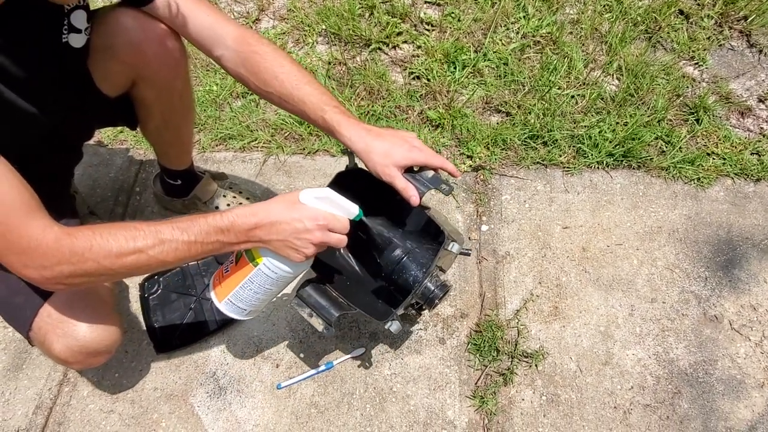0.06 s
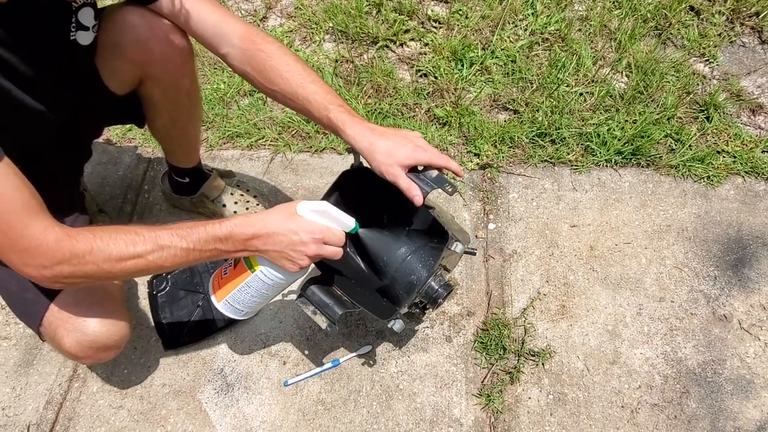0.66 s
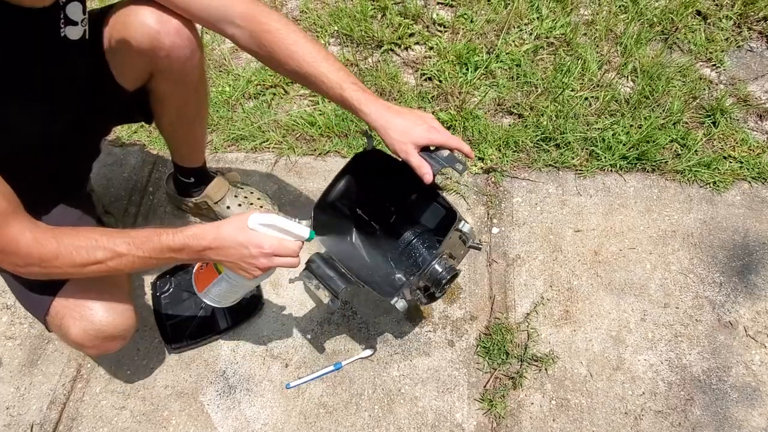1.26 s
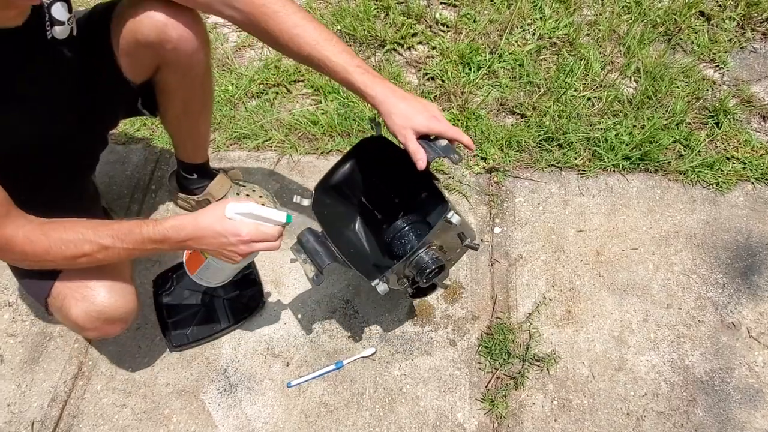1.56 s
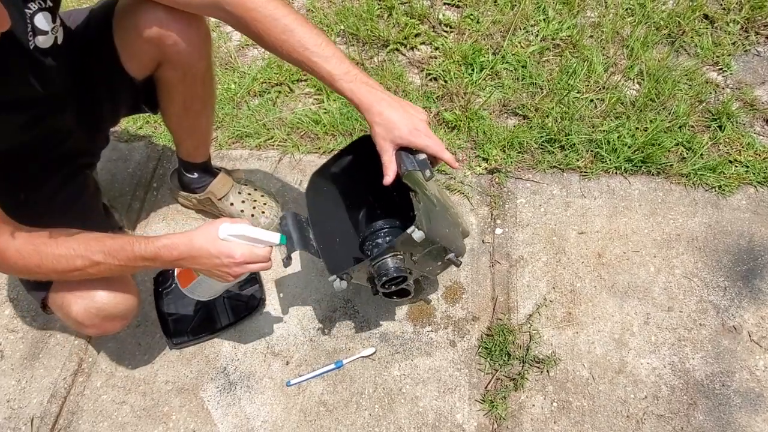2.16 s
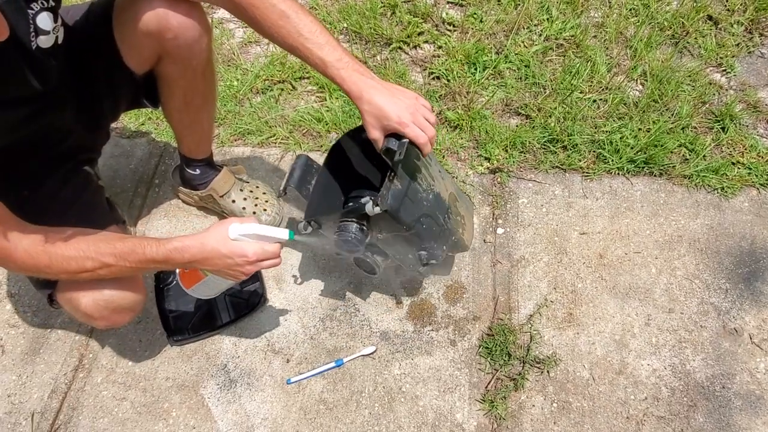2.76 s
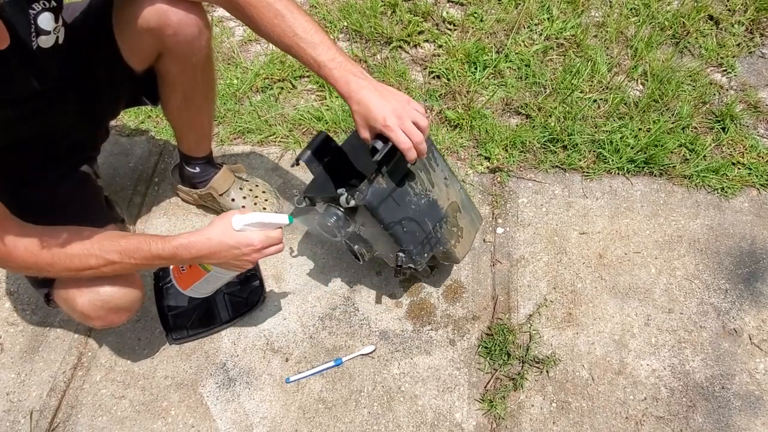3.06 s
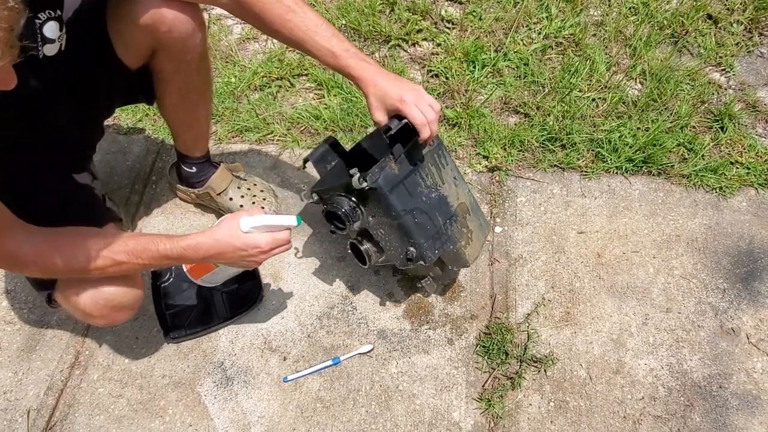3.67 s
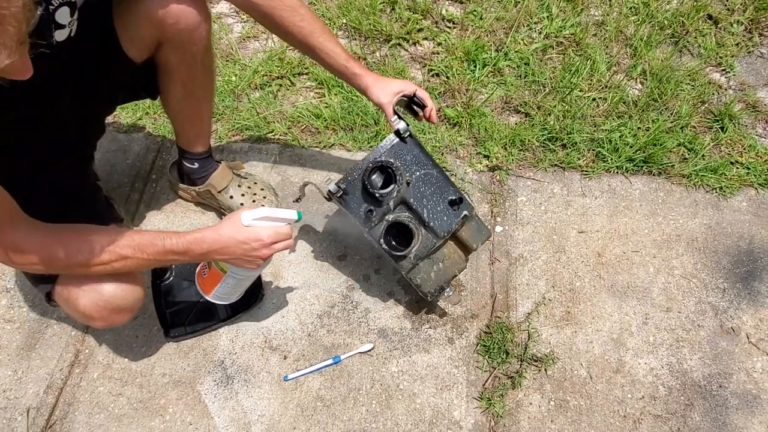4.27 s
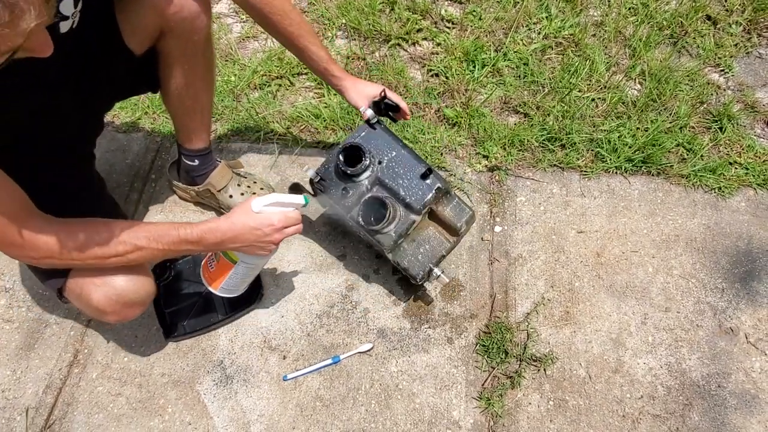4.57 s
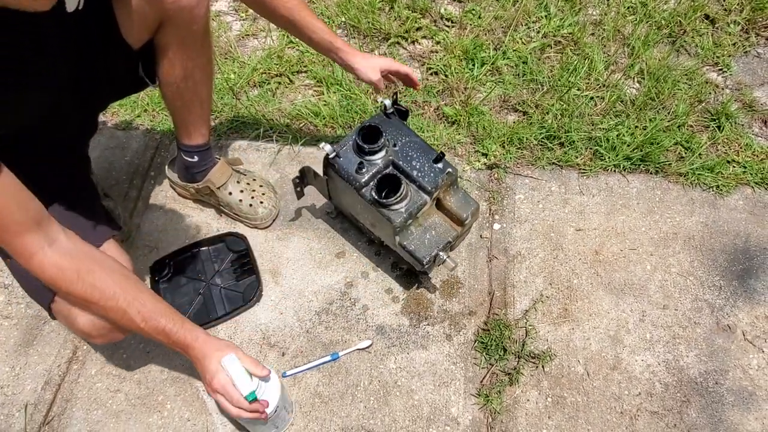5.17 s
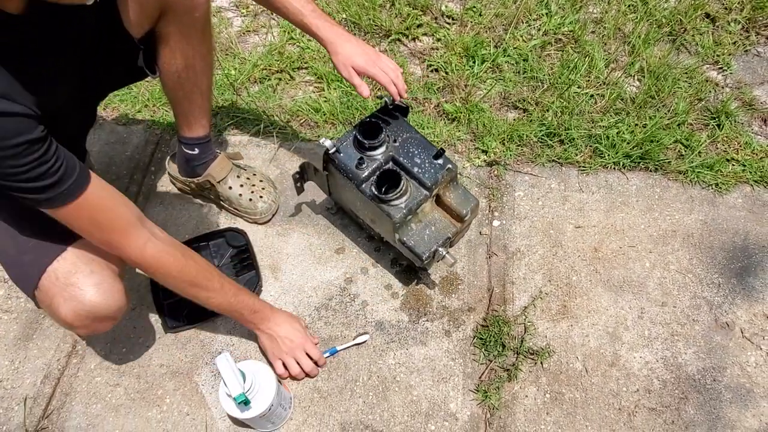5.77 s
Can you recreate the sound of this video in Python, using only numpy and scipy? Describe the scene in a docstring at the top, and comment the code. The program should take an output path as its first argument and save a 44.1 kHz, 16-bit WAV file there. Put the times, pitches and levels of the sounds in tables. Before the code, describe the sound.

A plastic tank gives a brief gritty scrape on concrete at the very start. From about 0.2 to 4.8 seconds a trigger spray bottle is pumped close by, roughly three strokes a second. Each stroke is a short, bright hiss with fine droplets pattering on plastic, followed by a small liquid gulp and the click of the returning trigger. At about 4 seconds the hollow tank bumps the ground with a dull boom. At 4.6 seconds it tips over with the loudest sound, a hollow clunk with a tiny metallic ping, then rocks with smaller knocks and crunching grit until about 5.1 seconds. The bottle is set down with a light thud near 5.2 seconds and ticks as it settles. Clothes rustle softly towards the end. A faint, low hum from a distant engine and quiet outdoor air continue throughout, with very little echo.

```python
"""A trigger bottle squirts cleaner onto a hollow plastic tank, about three strokes a second, outdoors.
In each stroke pump pressure drives a hissing jet whose droplets patter on the tank; the pump refills
with a gulp, the trigger snaps back, and at times the valve ticks. The tank scrapes on the concrete path
by stick-slip friction; later it tips over and rocks to rest, each impact exciting its damped modes.
The bottle is set down, clothes rustle, and a distant engine hums throughout."""
import sys
import numpy as np
from scipy import signal
from scipy.fft import rfft, irfft, next_fast_len
from scipy.io import wavfile
from scipy.ndimage import uniform_filter1d, map_coordinates

SR = 44100
rng = np.random.default_rng(int(sys.argv[2]) if len(sys.argv) > 2 else 0)


def generate_wav(sig):
    """Save sig (samples, or channels by samples) to the path in sys.argv[1] as 16-bit PCM at SR."""
    pcm = np.round(np.clip(np.atleast_2d(sig).T, -1, 1) * 32767).astype(np.int16)
    wavfile.write(sys.argv[1], SR, pcm)


N = 261072
TIME = np.arange(N) / SR
AGE = np.arange(SR // 2) / SR  # time since the onset of an event, t/s

# the trigger returns to its stop: t/s, snap level/dB, gulp level/dB
RELEASES = [(0.1987, -34, -41.5), (.5491, -31, -68), (.883, -56, -33.5), (1.1931, -32.5, -36),
            (1.5199, -37, -34), (1.8679, -37.5, -34), (2.2227, -33, -33.5), (2.5907, -37.5, -33),
            (2.9497, -40.5, -36), (3.3429, -47.5, -37), (3.7052, -39.5, -37), (4.0794, -36, -39),
            (4.4572, -41, -38.5), (4.8064, -38, -36.5)]
# spectrum of liquid passing the pump's valves: f/Hz, level/dB
LIQUID_SPECTRUM = [(200, -36), (450, -8), (1200, -7.5), (2000, -7.5), (2800, 4), (4200, -6), (5000, 1.5),
                   (6500, -4), (9500, -9), (12000, -6), (16000, -6)]


def mist():
    """Jet noise: hiss and droplet patter follow powers of the pump pressure, the patter more steeply."""
    squirts = [(0.283, 0.16, -53, -55.5), (0.609, 0.17, -50, -51), (.918, 0.18, -47.5, -48.5),
               (1.237, 0.18, -48, -50), (1.576, 0.19, -50, -52), (1.916, 0.19, -49.5, -50.5),
               (2.291, 0.19, -49, -51.5), (2.644, 0.18, -48.5, -53), (3.021, .21, -47.5, -55),
               (3.401, .19, -45.5, -54), (3.773, .2, -46, -52.5), (4.151, 0.2, -50.5, -55.5),
               (4.511, 0.19, -45.5, -50)]  # squeezes: t/s, duration/s, hiss level/dB, patter level/dB
    jet_spectrum = [(1000, -50), (3500, -28), (5000, -11), (6200, -13), (7400, 1), (8200, -5.5),
                    (10400, -6.5), (12000, 0), (14500, 4.5), (15800, 3)]  # hiss at the nozzle: f/Hz, level/dB
    neck_spectrum = [(200, -36), (350, -0.5), (460, 8.5), (620, -12), (850, -30), (1000, 2.5), (1150, -27),
                     (1300, -3), (1550, -5.5), (1850, -2.5), (2400, -46)]  # resonances of the tank's open neck: f/Hz, level/dB
    out = np.zeros((2, N))
    for s, length, hiss_db, patter_db in squirts:
        hiss = amp(hiss_db + 5) * pressure(length) ** 1.52 * noise(jet_spectrum, size=len(AGE))
        droplets = amp(patter_db + 4.5) * pressure(length) ** 2.53 * patter(s)
        add(out, s, bounced(hiss, share=.3) + bounced(droplets, share=.5))
    # one squirt blows into the neck
    add(out, 2.63, amp(-52.5) * pressure(length=0.24) * noise(neck_spectrum, size=len(AGE)))
    sputter_db = 1.5 * wobble(90) + 0.5 * wobble(1600)  # the jet breaks into droplets
    return out * amp(sputter_db)


def pressure(length):
    """Driving pressure of one squeeze: it builds, sags exponentially as the trigger travels, and dies."""
    sag_db_per_s = 7
    return swell(AGE, length, rise=0.059, fall=0.12) * amp(-sag_db_per_s * AGE)


def patter(s):
    """Resonant filtering: the hollow facing the jet at time s colours the noise of droplet impacts."""
    impact_spectrum = [(150, -46), (600, -6), (1100, -8.5), (1500, -6.5), (2250, -7), (2680, 2.5),
                       (3500, -7), (4200, -7.5), (4800, -2.5), (7000, -11.5), (15000, -14.5)]  # droplets on plastic: f/Hz, level/dB
    hollow = [(2.6, 1736), (3.3, 1590)]  # the resonance falls as the tank is turned: t/s, f/Hz
    hollow_hz = np.interp(s, *np.transpose(hollow))
    impacts = noise(impact_spectrum, size=len(AGE))
    return unit(filtered(impacts, lambda hz: 1 + 2.33 * resonance(hz, hollow_hz, half_width=87)))


def gulps():
    """Unsteady flow: the pump draws liquid in gurgles just before the trigger meets its stop."""
    lead_s, gurgle_db = .0355, 3
    out = np.zeros((2, N))
    for s, _, db in RELEASES:
        add(out, s - lead_s, amp(db + 1.5) * burst(LIQUID_SPECTRUM, attack=0.0073, t60=0.042))
    return out * amp(gurgle_db * wobble(250))


def valve():
    """Impulse excitation: the valve shuts as a squeeze begins and thumps the bottle and spray head."""
    closures = [(0.2724, -39), (0.604, -32.5), (0.911, -39.5), (1.9049, -37.5), (2.6274, -41.5),
                (2.994, -43.5), (3.381, -35)]  # audible closures: t/s, level/dB
    modes = [(467, 0, 0.044), (2560, -8, 0.043)]  # bottle and head: f/Hz, level/dB, T60/s
    out = np.zeros((2, N))
    for s, db in closures:
        add(out, s, amp(db - 5) * burst(LIQUID_SPECTRUM, attack=0.0019, t60=0.042))
        add(out, s, amp(db - 9) * ring(modes, attack=0.0019))
    return out


def trigger():
    """Free vibration: the trigger's sharp stop rings the plastic head, then the bottle shivers briefly."""
    head_modes = [(484, -12.5, 0.015), (740, -12.5, 0.019), (1180, -8, 0.0085), (1635, -7, 0.02),
                  (2612, -2.5, 0.019), (2800, 3, 0.014), (3680, -6.5, 0.023), (4590, -17, 0.024)]  # spray head: f/Hz, level/dB, T60/s
    snap_spectrum = [(300, -11), (800, -0.5), (3000, -1.5), (6500, -9), (16000, -15.5)]  # contact noise: f/Hz, level/dB
    out = np.zeros((2, N))
    for s, db, _ in RELEASES:
        crack = amp(-3) * burst(snap_spectrum, attack=.0016, t60=0.018)
        shiver = amp(-11.5) * burst(snap_spectrum, attack=.007, t60=0.074)
        head = amp([[3], [-.5]]) * ring(head_modes, attack=.0018, detune=.05)  # louder on the left
        add(out, s, amp(db) * (head + crack + shiver))
    return out


def tank():
    """Modal response to impact: a corner lands, the edge follows and the tank rebounds."""
    # landings: t/s, boom level/dB, boom centre f/Hz, knock level/dB, clack level/dB,
    # treble cutoff f/Hz, rebound delay/s
    landings = [(3.974, -11, 197, -25, -30, 1310, .022), (4.587, -30.5, 268, -41, -24, 3280, 0.011),
                (4.615, -9.5, 328, -22.5, -20, 8400, .051), (4.829, -17.5, 270, -32.5, -21.5, 5600, 0.024),
                (4.911, -15, 250, -35.5, -25.5, 7160, .054), (5.025, -30, 235, -58, -42.5, 4000, 0.023),
                (5.066, -39, 322, -70, -44.5, 4470, 0.023)]
    wall_modes = [(145.2, -11, 0.13), (206.6, -9.5, 0.25), (245.4, -1.5, 0.1), (282, -1.5, 0.075),
                  (293.1, -9.5, 0.27), (318.6, 3.5, 0.11), (363, -15.5, 0.079)]  # low modes of the wide walls: f/Hz, level/dB, T60/s
    shell_modes = [(444, -11, 0.1), (519.5, -4, 0.11), (604, -4.5, 0.047), (716, 3, 0.03), (841, -15, 0.11),
                   (943, -9, 0.063), (1077, -9, 0.11), (1455, -11, 0.05), (1613, -15, 0.087),
                   (1888, -5.5, 0.062), (2065, -12, 0.055), (2923, -30, 0.065), (3880, -11, 0.033)]  # stiff upper modes: f/Hz, level/dB, T60/s
    clack_spectrum = [(120, -24), (600, -12), (1200, -3.5), (1850, 0.5), (2300, -6.5), (3700, 0.5),
                      (6300, -9), (16000, -5.5)]  # plastic striking grit: f/Hz, level/dB
    boom_lag_s, boom_db_per_octave, edge_s = 0.0029, 13, .007
    out = np.zeros((2, N))
    for s, boom_db, boom_hz, knock_db, clack_db, cutoff_hz, rebound_s in landings:
        # the walls gather motion just after contact, mostly near one pitch
        excited = [(hz, db - boom_db_per_octave * abs(np.log2(hz / boom_hz)), t60)
                   for hz, db, t60 in wall_modes]
        for delay, db in [(0, 0), (rebound_s, -17.5)]:
            add(out, s + delay + boom_lag_s, amp(boom_db + db) * ring(excited, attack=0.0066))
        for delay, db in [(0, 0), (edge_s, -8.5), (rebound_s, -16)]:
            knock = amp(knock_db) * ring(shell_modes, attack=.001, detune=.004)
            grit = burst(clack_spectrum, attack=0.00046, t60=0.034)
            clack = amp(clack_db + 4.5) * bounced(grit, share=0.35)
            # a softer contact lasts longer and so loses its treble
            contact = filtered(knock + clack, lambda hz: 1 / (1 + 1j * hz / cutoff_hz) ** 2)
            add(out, s + delay, amp(db) * contact)
    return out


def bracket():
    """Hard contact excites high modes: the tank's steel bracket pings, louder on the left."""
    strikes = [(4.614, -21.5), (4.909, -38)]  # blows to the bracket: t/s, level/dB
    steel_modes = [(4610, -19, 0.12), (7470, -11.5, 0.1), (11140, 7, 0.06), (11210, -30, 0.25),
                   (11400, -7, .06)]  # its ringing: f/Hz, level/dB, T60/s
    out = np.zeros((2, N))
    for s, db in strikes:
        add(out, s, amp(db) * amp([[3], [-4]]) * ring(steel_modes, attack=0.00021))
    return out


def scrape():
    """Stick-slip friction: the tank's edge judders over sandy concrete and its shell resonates."""
    sand_spectrum = [(150, -1), (330, -17), (520, -7), (700, -19), (950, -5), (1200, -10), (1800, -3),
                     (2300, -5.5), (5000, -4), (6500, -7), (9500, -11.5), (12000, -7), (16000, -7.5)]  # sliding on sand: f/Hz, level/dB
    start_s, period_s, slip_s = -0.012, 0.01978, 0.01
    age = TIME - start_s
    push = amp(-30.5) * swell(age, length=0.14, rise=.045, fall=0.042)
    slips = push * np.exp(-((2 * (age % period_s) - period_s) / slip_s) ** 2)
    slips += 0.27 * uniform_filter1d(slips, size=1000)  # sand keeps trickling between the slips
    rasp = slips * amp(1.7 * wobble(896)) * noise(sand_spectrum)
    return filtered(rasp, lambda hz: 1 + 1.34 * resonance(hz, 520, 50) + 0.59 * resonance(hz, 1830, 110))


def grinding():
    """Granular friction: grains give way one after another under the rocking tank."""
    grinds = [(4.831, -43.5), (4.915, -37)]  # the tank bears on grit: t/s, level/dB
    # crunching grains: f/Hz, level/dB
    spectrum = [(200, 6.5), (1500, 4.5), (3000, 5.0), (4500, -1), (6500, -19), (16000, -16)]
    out = np.zeros((2, N))
    for s, db in grinds:
        add(out, s, amp(db) * burst(spectrum, attack=0.004, t60=0.22))
    return out * amp(7 * wobble(320))


def bottle():
    """Damped vibration: the part-filled bottle thuds on the concrete and ticks as it settles."""
    contacts = [(5.180, -26.5, -37.5), (5.194, -40, -47), (5.226, -41, -43), (5.263, -56, -33.5),
                (5.432, -58.5, -45.5)]  # its base touches: t/s, thud level/dB, tick level/dB
    modes = [(175, -8.5, 0.15), (303, -12, 0.058), (580, -0.5, 0.021), (683, 2, 0.022), (840, -21, 0.076),
             (1114, -3.5, 0.015), (1490, -17.5, 0.058)]  # its body: f/Hz, level/dB, T60/s
    # contact noise: f/Hz, level/dB
    tick = [(300, -2.0), (1500, 0.5), (2800, 4), (4300, -4.0), (6000, -9.5), (10000, -11.5), (15000, -3)]
    out = np.zeros((2, N))
    for s, thud_db, tick_db in contacts:
        add(out, s, amp(thud_db) * ring(modes, attack=0.00058))
        add(out, s, amp(tick_db + 2.5) * burst(tick, attack=0.0013, t60=0.039))
    return out


def engine():
    """Periodic firing: a distant engine hums in partials that waver in phase and level."""
    drone = [(0, -55), (2.2, -51.5), (3.6, -50), (4, -56), (5.9, -56)]  # course of the hum: t/s, level/dB
    partials = [(1, -1), (1.5, -14), (2, -18), (2.5, -25)]  # engine orders: f/firing rate, level/dB
    firing_hz, waver_db = 95.76, 2
    drone_db = np.interp(TIME, *np.transpose(drone))
    phase = 2 * np.pi * firing_hz * TIME + 0.43 * wobble(12)
    return sum(amp(drone_db + db + waver_db * wobble(6.8)) * np.sqrt(2) * np.sin(order * phase)
               for order, db in partials)


def air():
    """Ambient noise: a crossover at 300 Hz divides low rumble from faint hiss."""
    spectrum = [(15, -24), (40, -1), (107, -1.5), (146, -7.5), (228, -14.5), (293, -22.5), (347, -21),
                (446, -25.5), (678, -28), (1000, -34.5), (1120, -36.5), (4180, -47), (7520, -47),
                (8180, -53), (16000, -49.5)]  # outdoor background: f/Hz, level/dB
    ambient = noise(spectrum)
    rumble = filtered(ambient, lambda hz: 1 / (1 + (hz / 300) ** 4))
    return amp(-52) * rumble + amp(-47) * (ambient - rumble)


def rustle():
    """Friction noise: sleeve and shoe sole rub unevenly close by."""
    shuffles = [(4.627, 0.99, -61), (5.785, .5, -59.5)]  # movements: t/s, duration/s, level/dB
    spectrum = [(200, 10), (600, 0.5), (1500, -3), (3000, -6.5), (4000, -5), (5200, -3), (6300, -9),
                (11000, -13), (16000, -12)]  # rubbing cloth and sole: f/Hz, level/dB
    motion = sum(amp(db) * swell(TIME - s, length, rise=0.16, fall=0.44) for s, length, db in shuffles)
    return motion * amp(2 * wobble(46)) * noise(spectrum)


def bounced(x, share):
    """Comb filtering: concrete and tank wall each return a copy, by paths that differ at each event."""
    delays = rng.uniform(.0005, .003, (2, 2))
    echoes = lambda hz: np.exp(-2j * np.pi * hz * delays[..., None]).sum(axis=1)
    return filtered(x, lambda hz: 1 + share * echoes(hz)) / np.sqrt(1 + 2 * share ** 2)


def yard(x):
    """Reverberation: convolution with a short, thin noise tail stands for the surroundings."""
    decay = [(200, 0.046), (2000, 0.2), (12000, 0.19)]  # reverberation time: f/Hz, T60/s
    hz, t, spectra = signal.stft(rng.standard_normal((2, SR // 2)), SR, nperseg=256)
    tail = signal.istft(spectra * amp(-60 * t / along(decay, hz)[:, None]), SR, nperseg=256)[1]
    return signal.fftconvolve(x, tail / np.linalg.norm(tail[0]), axes=1)[:, :N]


def ring(modes, attack, detune=0):
    """Superposed damped modes; grip and point of contact vary their strengths and, by detune, pitches."""
    hz, db, t60 = np.transpose(modes)[:, :, None]
    strength_db = db + rng.standard_normal(hz.shape)
    pitch = hz * np.exp(detune * rng.standard_normal(hz.shape))
    sign = (-1) ** np.arange(len(hz))[:, None]  # neighbouring modes push the wall in opposite directions
    partials = sign * amp(strength_db - 60 * AGE / t60) * np.sin(2 * np.pi * pitch * AGE)
    return partials.sum(axis=0) * (1 - np.exp(-AGE / attack))


def burst(colour, attack, t60):
    """Heavy damping: a contact that cannot ring gives noise that rises and dies."""
    return noise(colour, size=len(AGE)) * (1 - np.exp(-(AGE / attack) ** 2)) * amp(-60 * AGE / t60)


def noise(colour, size=N):
    """Partial coherence: stereo noise of rms 1, alike in the bass and nearly unrelated in the treble."""
    coherence = [(30, 0.66), (100, 0.96), (500, 0.77), (900, 0.079), (1800, 0.13), (3500, 0.24),
                 (7500, 0.05), (13000, 0.035)]  # likeness of left and right: f/Hz, correlation
    balance = [(300, 0.5), (800, -1.5), (1800, 4.5), (4000, -2.5), (7500, -2), (13000, 2.5)]  # left minus right: f/Hz, level/dB
    angle = lambda hz: np.arccos(np.clip(along(coherence, hz), -1, 1)) / 2
    white = rng.standard_normal((2, size))
    mid, side = filtered(white, lambda hz: amp(along(colour, hz)) * [np.cos(angle(hz)), np.sin(angle(hz))])
    stereo = np.array([mid + side, mid - side])
    return unit(filtered(stereo, lambda hz: amp(np.outer([.5, -.5], along(balance, hz)))))


def resonance(hz, centre, half_width):
    """Complex response of one mode near its natural frequency."""
    return 1 / (1 + 1j * (hz - centre) / half_width)


def swell(age, length, rise, fall):
    """Envelope from 0 to 1 with rounded shoulders."""
    return np.sin(np.pi / 2 * np.clip(age / rise, 0, 1)) * np.sin(np.pi / 2 * np.clip((length - age) / fall, 0, 1))


def wobble(rate):
    """Smooth random modulation, rate knots a second."""
    return map_coordinates(rng.standard_normal(int(N * rate / SR) + 4), [TIME * rate])


def filtered(x, response):
    """Linear filtering: the spectrum of x times a frequency response."""
    n = x.shape[-1]
    m = next_fast_len(n + 8192)
    return irfft(rfft(x, m) * response(np.fft.rfftfreq(m, 1 / SR)), m)[..., :n]


def add(track, s, sound):
    """Superpose a sound on the track at time s."""
    part = track[:, max(round(s * SR), 0):][:, :sound.shape[-1]]
    part += sound[..., :part.shape[1]]


def along(points, hz):
    """Interpolate (f/Hz, value) points on a log axis."""
    f, v = np.transpose(points)
    return np.interp(np.log(hz + 1), np.log(f + 1), v)


def amp(db):
    """Decibels to gain."""
    return 10 ** (np.asarray(db) / 20)


def unit(x):
    """Scale to rms 1."""
    return x / np.sqrt(np.mean(x ** 2) + 1e-20)


def from_left(x, lead_s):
    """Arrival-time difference: the left channel leads the right."""
    return filtered(x, lambda hz: np.exp(1j * np.pi * lead_s * np.outer([1, -1], hz)))


def scene():
    """Localisation by delay: pump sounds and tank impacts lie nearly ahead, the rest a little more left."""
    left_lead_s, ahead_lead_s = 0.000095, 0.00004
    near = from_left(mist() + scrape() + grinding() + bottle(), left_lead_s)
    near += from_left(gulps() + valve() + trigger() + tank() + bracket(), ahead_lead_s)
    return near + amp(-15) * yard(near) + from_left(engine() + air() + rustle(), left_lead_s)


def record(dry):
    """Band limiting: a steep low-pass removes the highest treble."""
    cutoff_hz = 15820
    return filtered(dry, lambda hz: 1 / (1 + (hz / cutoff_hz) ** 200))


dry = scene()
out = record(dry)
generate_wav(out)
```